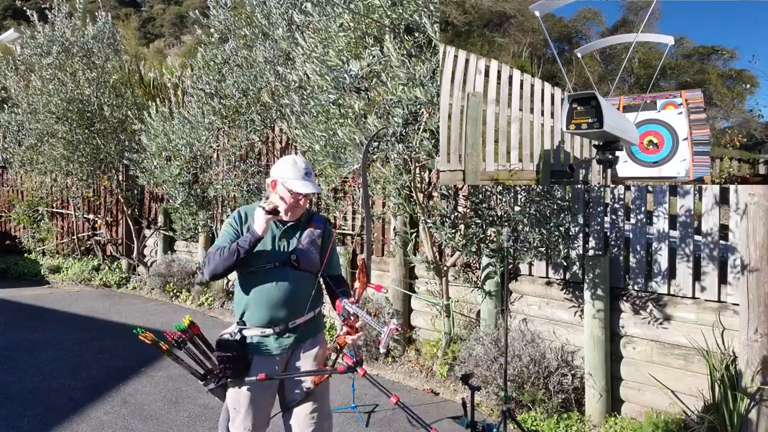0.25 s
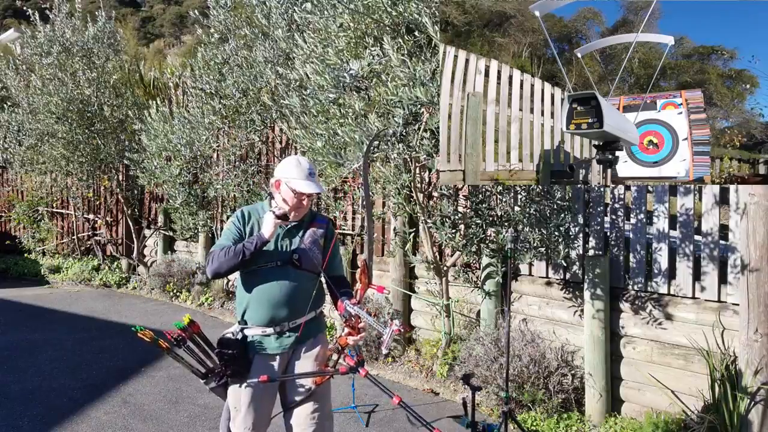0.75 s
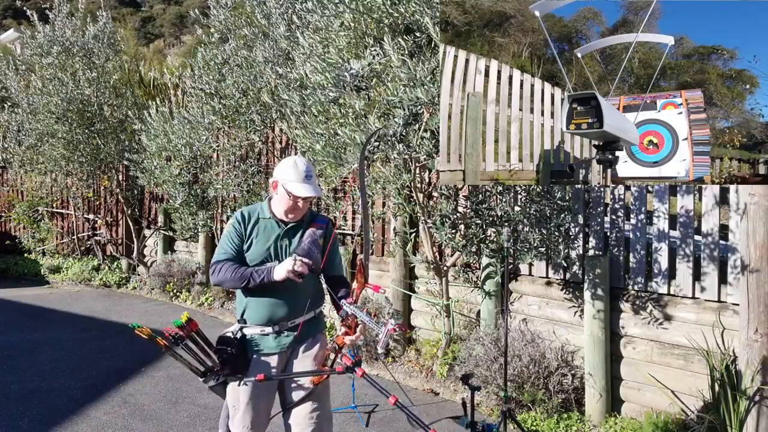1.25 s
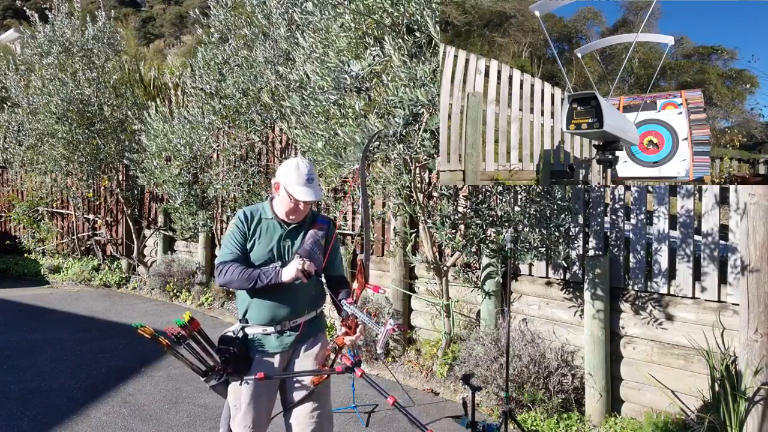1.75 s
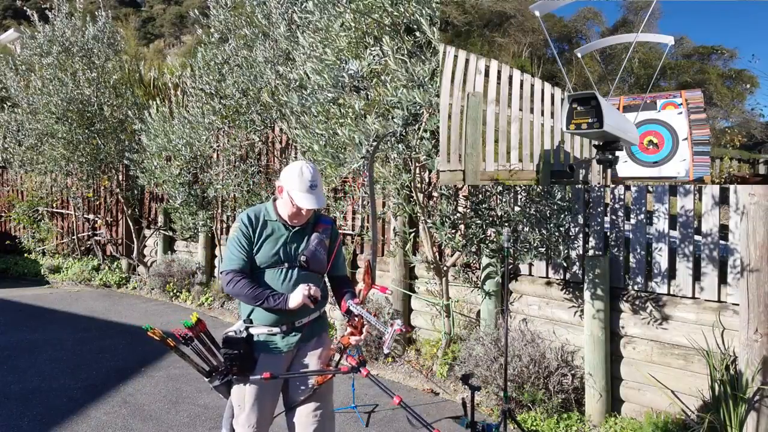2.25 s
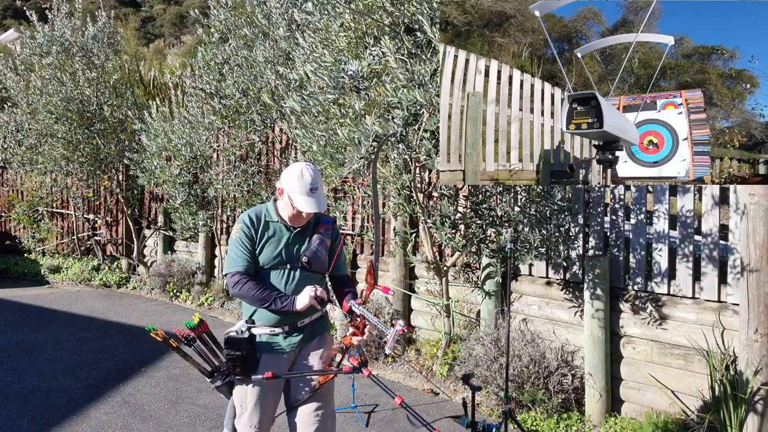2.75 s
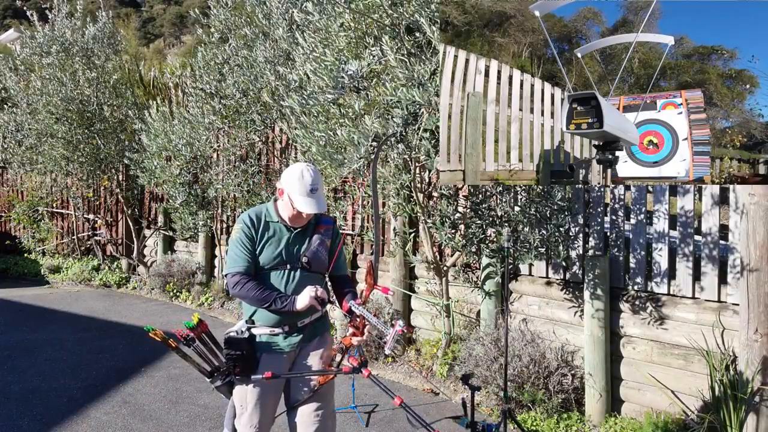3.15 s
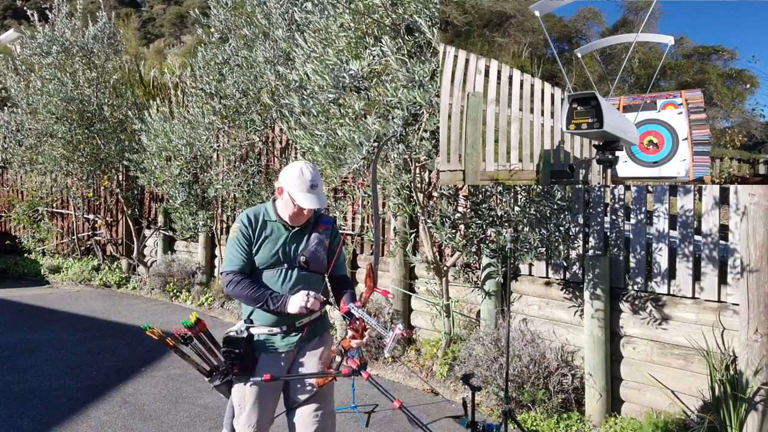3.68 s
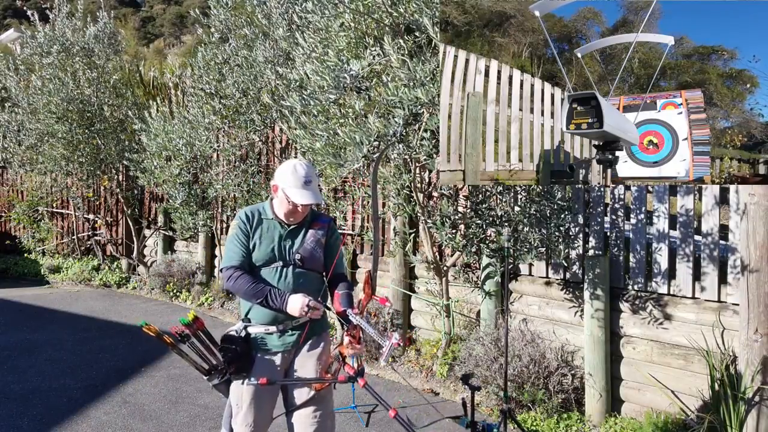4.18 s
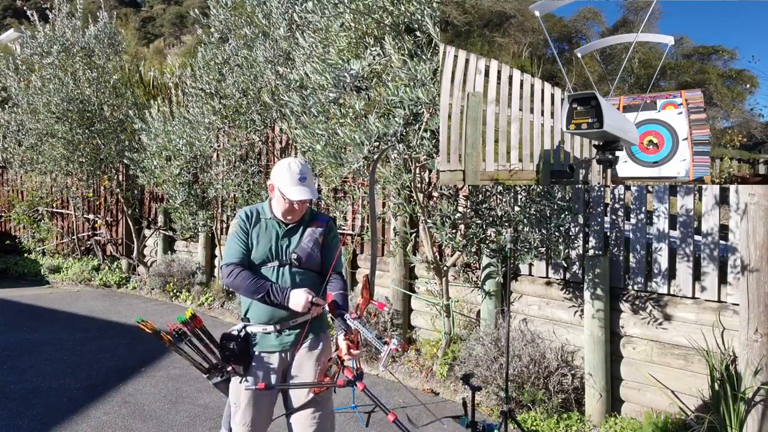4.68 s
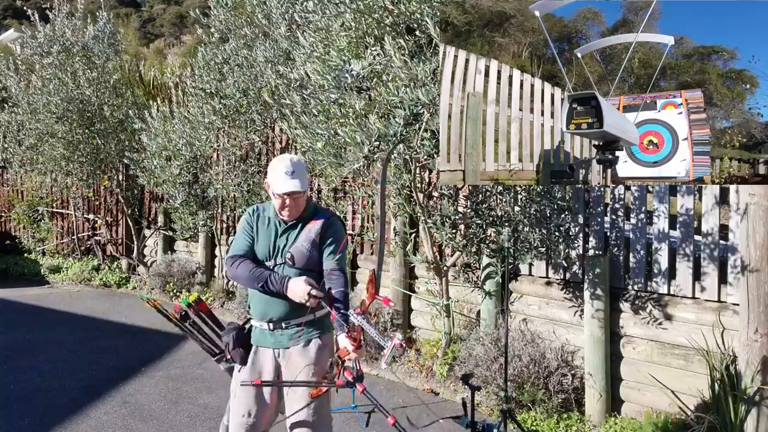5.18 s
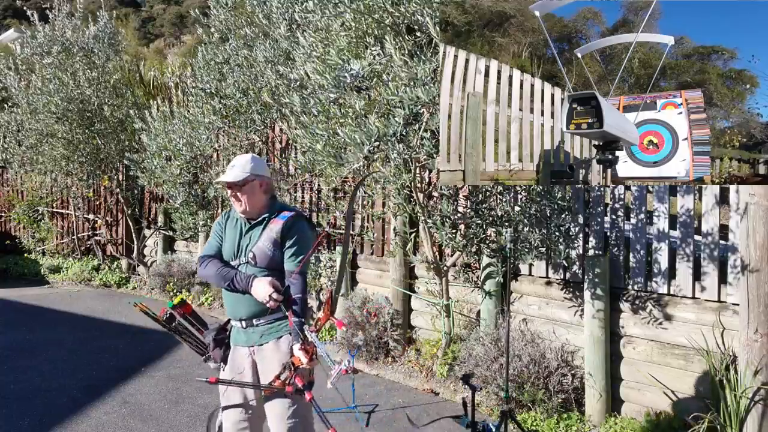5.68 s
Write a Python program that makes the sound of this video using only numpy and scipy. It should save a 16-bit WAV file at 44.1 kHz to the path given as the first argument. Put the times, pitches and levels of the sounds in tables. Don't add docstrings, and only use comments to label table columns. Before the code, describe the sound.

Close, dry handling sounds in stereo outdoors: gusty low thumps differ between left and right at first, with metallic ticks, leathery scuffs and short stick-slip squeaks until about 1.4 seconds. Then mostly soft cicada buzz, far traffic and very faint bird whistles. A single hard, bright nock click rings the bow midway; a duller, shuddering wooden knock and several light taps end it.

```python
import sys
import numpy as np
from scipy import signal
from scipy.fft import rfft, irfft, next_fast_len
from scipy.io import wavfile
from scipy.ndimage import uniform_filter1d, map_coordinates

SR = 44100
rng = np.random.default_rng(int(sys.argv[2]) if len(sys.argv) > 2 else 0)


def elevation(decibels):
    levels = np.asarray(decibels, float)
    return 10 ** (levels / 20)


def generate_wav(sig):
    pcm = np.round(np.clip(np.atleast_2d(sig).T, -1, 1) * 32767).astype(np.int16)
    wavfile.write(sys.argv[1], SR, pcm)


N = 261072

# (time [s], strength [dB], lean to left port [dB])
WIND_STRENGTH = [(0.0, -47.5, -1), (0.08, -37, 6), (0.25, -52, 8.0), (0.43, -39, 14), (0.56, -48.5, 1),
                 (0.67, -33, -1), (0.77, -43, -4.0), (0.81, -37, -6), (1.17, -57, 4), (2.09, -74, -8),
                 (2.41, -56, 14), (2.57, -54, -10), (2.74, -74, 8), (2.97, -54, -9), (3.26, -66, 6.5),
                 (5.13, -64.5, -4), (5.23, -54, 7), (5.92, -70, 4)]
# (frequency [Hz], level [dB])
EDDY_SPECTRUM = [(12, -43), (25, 2.5), (45, -6), (75, -2.5), (105, -6.5), (125, -10.5), (140, -26),
                 (250, -29.5), (500, -120)]
# (time [s], peak level [dB], width [s], swing [Hz])
LEFT_PUFFS = [(.025, -32, .015, 55), (.0745, -23.5, 0.038, 48), (.122, -30.5, 0.023, 70),
              (0.282, -36, 0.056, 55), (.37, -36, .015, 50), (.426, -29, .012, 55), (.449, -26, 0.021, 48),
              (.498, -30.5, .02, 65.4), (0.6568, -18.5, .016, 55), (.6776, -25, .015, 45),
              (.7, -20.5, 0.015, 65), (.7844, -27.5, 0.037, 52), (0.8452, -20.5, 0.014, 58),
              (0.9087, -22.5, 0.014, 58), (0.9322, -25.5, .02, 45), (1.1818, -35.5, .02, 58),
              (1.2972, -37.5, .02, 58), (2.271, -36.5, .015, 65), (2.3777, -38.5, 0.011, 65),
              (3.013, -39, .015, 58), (3.68, -38.5, .02, 58), (5.2395, -38.5, .012, 62)]
RIGHT_PUFFS = [(.044, -26, 0.011, 60), (.06, -21.5, .018, 68), (.098, -34, .03, 70), (.449, -33, .02, 55),
               (.57, -34, 0.014, 55), (0.6467, -18, .011, 62), (.6616, -15, 0.013, 68),
               (.683, -21, 0.013, 60), (.7304, -26, 0.028, 52), (.8, -18.5, 0.011, 55.4),
               (0.822, -19, .022, 42.2), (.852, -11, .013, 71), (.8837, -26, 0.016, 50),
               (0.9226, -20.5, .022, 45), (.944, -23.5, .016, 69.6), (1.0214, -35, 0.036, 72),
               (1.08, -37.5, .015, 65), (2.535, -37.5, .04, 45), (5.612, -42, .01, 60)]
# (frequency [Hz], unsteadiness [Hz], level [dB])
MOTOR_ORDERS = [(55.2, 6, -67), (66.5, 2.993, -58), (100.3, 2.49, -56), (120.4, 2.994, -68.5),
                (82.8, 33, -65.5)]
# (time [s], far traffic and leaves [dB], cicadas [dB])
BACKGROUND = [(0.0, -62.5, -66), (3.89, -65, -67), (5.92, -62.5, -66.5)]
# (frequency [Hz], level [dB])
FAR_SPECTRUM = [(100, -120), (125, -3.5), (228, -8.5), (308, -4), (433, -1.5), (562, -5), (730, -6.5),
                (1730, -13), (2110, -16), (3630, -17.5), (4100, -23.5), (5530, -27.5), (10100, -33.5),
                (15700, -34)]
# (frequency [Hz], likeness [-1..1])
LIKENESS = [(130, 0.7), (290, 0.63), (640, -0.01), (1400, -0.05), (4000, -0.08)]
# (frequency [Hz], level [dB])
TYMBAL = [(5200, -120), (5700, -38.5), (6400, -5), (7180, 3.5), (7900, -3.5), (8600, -15), (9400, -19),
          (10200, -71), (11000, -120)]

# (time [s], level [dB], resonance [Hz])
PINGS = [(.425, -42.5, 7770), (.960, -41, 7000), (.967, -51, 10100), (1.2265, -43, 4400), (1.18, -44, 4700),
         (1.236, -48, 3800), (1.265, -44, 1670), (1.45, -59, 4570), (.648, -52, 4600)]
CLACKS = [(.6225, -43, 5300), (.6225, -42.5, 6500), (.627, -44, 5100), (.617, -52, 2300),
          (.6225, -45, 3700), (1.286, -55, 11000), (1.1665, -53, 10300), (.81, -57, 2200),
          (.915, -56, 3830), (.969, -47, 4200), (5.785, -54, 1950), (.963, -54, 13500), (1.263, -52, 3500),
          (3.925, -59, 9200), (3.925, -63, 13000), (1.265, -47, 2250), (3.925, -55.5, 5300)]
SCUFFS = [(.968, -40.5, 3700), (1.108, -52, 1400), (1.06, -50.5, 1400), (1.287, -56, 9500),
          (1.285, -50, 1300), (1.369, -52, 3000), (2.25, -57.5, 4200), (3.928, -52.5, 3000),
          (5.775, -49, 1500), (5.792, -45, 1380), (.425, -47, 500), (0.22, -52, 300), (0.04, -55, 600)]
TAPS = [(.366, -38, 320), (4.74, -48, 1700), (5.251, -45, 1200), (5.4795, -40, 1100), (5.523, -44, 1700),
        (5.56, -40, 1400), (5.62, -44, 1500), (.915, -46.5, 13000), (.928, -54, 11500), (.426, -52, 11000),
        (5.6725, -33, 1500), (5.688, -42, 1400), (.848, -42, 230)]
# (width over pitch [ratio], t60 [s], crack [dB], attack [s])
PING_KIND = (0.091, 0.042, -12, .001)
CLACK_KIND = (0.17, 0.045, -4, .001)
SCUFF_KIND = (.55, 0.057, -9, .003)
TAP_KIND = (1.05, .012, -36, .0006)
# (frequency [Hz], level [dB])
CRACK_SPECTRUM = [(300, -14), (1500, 0), (4000, 1), (6500, -5), (10000, -10.5), (13000, -17), (16000, -22)]

# (frequency [Hz], level [dB], t60 [s])
BUCKLE_MODES = [(1490, -13, 0.04), (2019, -4, 0.037), (2186, 0.5, .04), (2320, 0.5, 0.041),
                (2977, -13, .05), (3714, -10, .03), (4980, -11.5, .05), (6045, -13, .04), (6500, -16, .02),
                (8400, -18, .03)]
# (time [s], level [dB], brightness [dB/octave])
BUCKLE_HITS = [
    (0.6226, -39, 2),
    (.627, -41, -4.5),
    (0.6407, -46, -5),
]
# (time [s], level [dB], frequency [Hz], t60 [s])
CHIMES = [(1.1665, -34.5, 4320, 0.036), (1.0555, -45, 4170, 0.045), (1.147, -43, 5000, .025),
          (1.2265, -41, 4260, .03), (1.2625, -42, 4200, 0.015), (1.2275, -46, 5050, .04),
          (1.2315, -37, 4730, .035), (1.237, -48, 3500, .05), (1.264, -43, 1680, .04),
          (.9595, -46, 7050, .05), (.964, -46, 6900, .04), (.425, -48, 7800, .03), (.885, -52, 3980, 0.028),
          (5.7745, -45, 5150, 0.017), (3.3192, -20.5, 4300, 0.0096), (3.3222, -33, 7800, .012),
          (3.3193, -23, 4800, .009), (3.3219, -16.5, 1800, .011), (3.3183, -32, 9900, .006),
          (3.319, -24, 1250, .012), (.6265, -39, 1497, .04), (.6745, -50, 4500, .012),
          (5.7745, -53, 4200, .015), (5.774, -58, 2800, .015), (5.787, -55, 4000, .012),
          (5.761, -59, 5200, .015), (.972, -53, 3020, 0.073), (.807, -55, 5650, .025),
          (.817, -56, 5650, .025)]

# (full pressure at [s], held [s], level [dB], hiss [dB], low [dB])
RUBS = [(.812, .004, -65, -9, -1), (.972, .004, -61.5, -7, -16), (.64, 0.032, -64, -13, -6),
        (1.05, 0.071, -62, -7, -11), (1.17, 0.077, -61, -5.5, -12), (1.285, 0.0092, -67, -18, 1.5),
        (1.34, 0.041, -76, -6, -2), (4.98, 0.17, -70.5, -21, 1), (5.77, .03, -68.5, -30, 2.5)]
# (frequency [Hz], width [Hz], level [dB])
SHAFT_MODES = [(2200, 81, -19), (2870, 68, 5.5), (3770, 35, 1), (4120, 55, 1), (4780, 120, -2.5),
               (5810, 100, 3), (7600, 130, -9), (10400, 140, -18)]
# (time [s], pitch [Hz], level [dB])
SLIDE_IN = [(.912, 5300, -60), (.922, 6000, -57), (.94, 7000, -50)]
SLIDE_OUT = [(1.026, 6200, -48), (1.04, 4430, -49), (1.05, 4250, -53), (1.058, 4167, -48),
             (1.08, 4180, -53)]
# (start [s], length [s], first pitch [Hz], last pitch [Hz], peak level [dB])
SQUEALS = [(.815, 0.037, 3030, 3000, -58), (.868, .017, 3830, 3880, -57), (.881, 0.012, 3900, 4050, -48.5),
           (.892, .012, 4300, 4900, -51), (.903, .013, 4800, 5050, -58), (.662, .017, 4250, 4300, -61),
           (1.035, .015, 5500, 5400, -58), (1.055, .03, 5200, 5150, -58), (1.078, .02, 4900, 4800, -51),
           (1.1, .035, 4900, 5200, -54), (1.1, 0.031, 3050, 2850, -56), (1.122, .026, 2150, 2160, -56.5),
           (1.137, .018, 4350, 4350, -52), (1.135, .03, 5920, 5890, -56), (1.168, 0.031, 5900, 5850, -59),
           (1.16, 0.032, 2250, 2160, -55), (1.19, .013, 2100, 2300, -46.5), (1.2, .022, 2390, 2300, -53),
           (1.165, 0.029, 1900, 1700, -55.5), (1.166, 0.032, 3780, 3730, -48.5),
           (1.177, .016, 4400, 4500, -51), (1.19, .015, 4500, 4400, -56), (1.21, .026, 6300, 6300, -62),
           (1.24, 0.022, 4500, 4700, -57), (0.81, .02, 3850, 3830, -63)]
# (start [s], length [s], first pitch [Hz], last pitch [Hz], peak level [dB])
GROANS = [(4.98, 0.05, 670, 675, -55), (4.99, 0.042, 830, 860, -60), (4.99, 0.016, 455, 450, -58),
          (5.092, .018, 850, 850, -50), (5.11, .04, 710, 760, -61), (5.03, 0.02, 770, 770, -56),
          (5.085, 0.067, 1320, 1428, -53), (5.025, 0.035, 1480, 1486, -57.5),
          (5.068, .015, 2100, 2250, -57), (5.095, .03, 2100, 2100, -58), (5.065, .02, 710, 710, -55)]
# (start [s], length [s], first pitch [Hz], last pitch [Hz], peak level [dB])
WHISTLES = [(.77, .16, 2070, 2150, -67), (1.48, .08, 3750, 3500, -68), (1.58, .1, 3750, 3750, -74),
            (2.55, .08, 3750, 3700, -76), (2.72, .06, 3750, 3700, -76), (3.22, .05, 3750, 3700, -75),
            (3.36, .1, 3750, 3700, -74), (3.52, .04, 3780, 3700, -69), (3.64, .06, 3750, 3700, -73),
            (4.08, .08, 2520, 2500, -74), (4.19, .07, 2500, 2470, -73), (5.84, .13, 2500, 2450, -67)]
# (from [s], to [s], low pitch [Hz], high pitch [Hz], level [dB])
CHATTER = (1.04, 1.27, 3200, 6200, -55)

# (time [s], level [dB], crack [dB], brightness [dB/octave])
SNAPS = [
    (3.3184, -35, 8, 5),
    (3.3195, -29, 3, 1),
    (3.3221, -23, -5, -1),
    (3.3245, -38, 9, 4),
    (3.332, -31, -17, -5),
]
# (frequency [Hz], level [dB], t60 [s])
NOCK_MODES = [(1140, -6, 0.03), (1380, -12, 0.025), (1800, -4, 0.024), (2100, -5.5, 0.023),
              (2850, -10, 0.026), (4270, -8, .016), (4760, -8, 0.009), (6050, -20, 0.011),
              (7800, -12, 0.012), (9800, -15.5, 0.0082)]
# (frequency [Hz], level [dB])
RATTLE_SPECTRUM = [(300, -29), (600, -15), (1200, -4), (1900, 0), (2600, -3), (4500, -17), (6000, -26),
                   (10000, -22), (16000, -38)]
# (frequency [Hz], level [dB], t60 [s])
BOW_MODES = [(451, -20.5, .36), (472, -18, .1), (654, -16, .32), (560, -18, .07), (857, -23, .25),
             (1107, -20, .24), (1367, -17, .15), (1508, -14, .08), (1618, -3, .1), (1745, -5, .08),
             (1840, -14, .09), (2070, -8, .07), (2115, -6, .08), (2390, -18, .08)]
# (frequency [Hz], level [dB], t60 [s])
RISER_MODES = [(2710, -16, 0.055), (2960, -12, .05), (3149, -21, .045), (4199, -16, .04), (4296, -12, .03),
               (4538, -22, .08), (4840, -23, .07), (6831, -24, .04)]
# (time [s], level [dB], brightness [dB/octave], time until pad grips [s])
KNOCKS = [
    (5.0845, -28.5, -1, 0.0055),
    (5.0935, -41, 3, 0.0086),
    (5.103, -41, 1, 0.0047),
    (5.1105, -40, -1, .009),
    (5.127, -42.5, -1, .009),
    (5.1415, -45, -1, 0.0038),
]
# (frequency [Hz], level [dB], t60 [s])
STAND_MODES = [(548, -9.5, 0.029), (811, 1, 0.035), (1335, -5, 0.029), (1670, -12, 0.022),
               (2245, -12, 0.025), (3300, -15, .012)]


def unit(x):
    return x / np.sqrt(np.mean(x ** 2, axis=-1, keepdims=True) + 1e-20)


def along(points, hz):
    f, v = np.transpose(points)
    return np.interp(np.log(hz + 1), np.log(f + 1), v)


def curves(rows):
    s, *cols = np.transpose(rows)
    return [np.interp(np.arange(N) / SR, s, c) for c in cols]


def wobble(rate_hz):
    knots = rng.standard_normal(int(N * rate_hz / SR) + 4)
    return map_coordinates(knots, [np.arange(N) * rate_hz / SR])


def filtered(x, response):
    m = next_fast_len(N + 8192)
    return irfft(rfft(x, m) * response(np.fft.rfftfreq(m, 1 / SR)), m)[..., :N]


def coloured(x, spectrum):
    return unit(filtered(x, lambda hz: elevation(along(spectrum, hz))))


def add(track, s, sound):
    part = track[..., max(round(s * SR), 0):][..., :sound.shape[-1]]
    part += sound[..., :part.shape[-1]]


def ring(modes, tilt_db, scatter_db, attack_s):
    t = np.arange(SR // 4) / SR
    hz, db, t60_s = np.transpose(modes)[:, :, None]
    strength, phase = rng.standard_normal((2, len(hz), 1))
    level_db = db + tilt_db * np.log2(hz / 1000) + scatter_db * strength - 60 * t / t60_s
    partials = elevation(level_db) * np.sin(2 * np.pi * hz * t + 0.42 * phase)
    return partials.sum(axis=0) * (1 - np.exp(-t / attack_s))


def burst(gain, t60_s, attack_s):
    t = np.arange(SR // 4) / SR
    spectrum = rfft(rng.standard_normal(len(t))) * gain(np.fft.rfftfreq(len(t), 1 / SR))
    noise = irfft(spectrum, len(t))
    shape = elevation(-60 * t / t60_s) * (1 - np.exp(-t / attack_s))
    return unit(noise * shape) * np.sqrt(np.mean(shape ** 2))


def crack(t60_s):
    return burst(lambda hz: elevation(along(CRACK_SPECTRUM, hz)), t60_s, 0.00024)


def glides(rows):
    return [[(s, first_hz, db), (s + length_s, last_hz, db)] for s, length_s, first_hz, last_hz, db in rows]


def tones(calls, rough_rad, breaks_db):
    swell_db, thins_db_per_octave = 7, 30
    out = np.zeros(N)
    shake, slip = wobble(400), -wobble(110) ** 2
    for k, points in enumerate(calls):
        s, hz, db = np.transpose(points)
        t = np.arange(s[0], s[-1], 1 / SR)
        u = np.linspace(-1, 1, len(t))
        part = slice(k * SR // 5, k * SR // 5 + len(t))
        pitch_hz = np.interp(t, s, hz)
        phase = 2 * np.pi * np.cumsum(pitch_hz) / SR + rough_rad * shake[part]
        thinning_db = thins_db_per_octave * np.log2(pitch_hz / hz.min())
        swell = elevation(np.interp(t, s, db) - swell_db * u ** 2 - thinning_db) * (1 - u ** 8)
        add(out, s[0], swell * elevation(breaks_db / 2 + breaks_db * slip[part]) * np.sin(phase))
    return out


def wind():
    murmur_top_db = -45
    strength_db, lean_db = curves(WIND_STRENGTH)
    lumps = elevation(3.1 * np.array([wobble(14), wobble(14)]))
    port_db = np.minimum([strength_db + lean_db / 2, strength_db - lean_db / 2], murmur_top_db)
    murmur = elevation(port_db + 4.0) * coloured(lumps * rng.standard_normal((2, N)), EDDY_SPECTRUM)

    lead = SR // 10
    t = np.arange(-lead, lead) / SR
    puffs = np.zeros((2, N + lead))
    for port, rows in zip(puffs, (LEFT_PUFFS, RIGHT_PUFFS)):
        for s, db, width_s, swing_hz in rows:
            bell = np.exp(-.5 * (2 * t / width_s) ** 2)
            add(port, s, -elevation(db) * bell * np.cos(2 * np.pi * swing_hz * t))

    def wind_guard(hz):
        return .012 + 1 / (1 + (hz / 125) ** 16)
    return murmur + filtered(puffs[:, lead:], wind_guard)


def motor():
    t = np.arange(N) / SR
    out = np.zeros(N)
    for hz, spread_hz, db in MOTOR_ORDERS:
        strength = elevation(db + 2.0 + 1.73 * wobble(spread_hz))
        out += strength * np.sin(2 * np.pi * hz * t + 1.21 * wobble(spread_hz))
    return out


def traffic_and_leaves():
    z = signal.stft(rng.standard_normal((2, N)), nperseg=512)[2]
    patches = rng.standard_normal(z.shape[1:])
    patches = uniform_filter1d(uniform_filter1d(patches, 6, 0), 14, 1)
    pair = signal.istft(z * elevation(0.71 * patches / patches.std()), nperseg=512)[1][:, :N]

    def mid_side(hz):
        angle = np.arccos(np.clip(along(LIKENESS, hz), -1, 1)) / 2
        return elevation(along(FAR_SPECTRUM, hz)) * [np.cos(angle), np.sin(angle)]
    mid, side = filtered(pair, mid_side)
    return unit(np.array([mid + side, mid - side]))


def cicadas():
    beats = np.zeros((2, N))
    for rate_hz in rng.uniform(260, 370, size=4):
        for side_beats in beats:
            cycle = np.cumsum(rate_hz * (1 + 0.077 * wobble(4.1))) / SR
            side_beats += elevation(1.8 * wobble(3.8)) * np.exp(-4 * (cycle % 1))
    return coloured(np.sqrt(beats + .8) * rng.standard_normal((2, N)), TYMBAL)


def garden():
    far_db, cicada_db = curves(BACKGROUND)
    return elevation(far_db + 2.5) * traffic_and_leaves() + elevation(cicada_db + [[4], [1.5]]) * cicadas()


def ticks():
    out = np.zeros(N)
    kinds = [(PINGS, PING_KIND), (CLACKS, CLACK_KIND), (SCUFFS, SCUFF_KIND), (TAPS, TAP_KIND)]
    for rows, (width, t60_s, crack_db, attack_s) in kinds:
        for s, db, centre_hz in rows:
            def resonance(hz):
                peak = 1 / (1 + (2 * (hz / centre_hz - 1) / width) ** 2)
                return peak / (1 + (hz / centre_hz / 1.6) ** 8)
            contact = burst(resonance, t60_s, attack_s) + elevation(crack_db) * crack(t60_s)
            add(out, s, elevation(db - 5.5) * contact)
    return out


def buckle():
    out = np.zeros(N)
    for s, db, bright_db in BUCKLE_HITS:
        add(out, s, elevation(db) * ring(BUCKLE_MODES, bright_db, 1.6, 0.00056))
    for s, db, hz, t60_s in CHIMES:
        add(out, s, elevation(db) * ring([(hz, 0, t60_s)], 0, 0, 0.0013))
    return out


def rubbing():
    press_db_per_s, lift_db_per_s = 261, 282
    density = np.array([3.2 * wobble(400) + 1.8 * wobble(30) for _ in range(3)])
    grains = elevation(density) * rng.standard_normal((3, N))

    def shaft(hz):
        total = 0.38 * (hz > 2300) * (hz < 9000)
        for k, (centre_hz, width_hz, db) in enumerate(SHAFT_MODES):
            damping = 1j * hz * 3 * width_hz
            total = total + (-1) ** k * elevation(db) * damping / (centre_hz ** 2 - hz ** 2 + damping)
        return total
    body = unit(filtered(grains[0], shaft))
    hiss = coloured(grains[1], [(6000, -36), (8000, 6.5), (12000, 9.0), (15500, 0)])
    low = coloured(grains[2], [(500, -17), (1000, 1.5), (1700, 0.5), (2500, -5.0), (3500, -34)])

    out = tones([SLIDE_IN, SLIDE_OUT] + glides(SQUEALS), rough_rad=.7, breaks_db=4)
    out = out + tones(glides(GROANS), rough_rad=.6, breaks_db=5)
    t = np.arange(N) / SR
    for s, held_s, db, hiss_db, low_db in RUBS:
        pressing_db = press_db_per_s * np.clip(s - t, 0, 1)
        lifting_db = lift_db_per_s * np.clip(t - s - held_s, 0, 1)
        out = out + elevation(db - pressing_db - lifting_db) * (body + elevation(hiss_db) * hiss + elevation(low_db) * low)
    return out


def birds():
    return tones(glides(WHISTLES), rough_rad=.5, breaks_db=4.5)


def chatter():
    start_s, end_s, low_hz, high_hz, db = CHATTER
    out, t = np.zeros(N), np.arange(SR // 100) / SR
    for when, pitch, bend, size in rng.uniform(size=(50, 4)):
        hz = low_hz + (high_hz - low_hz) * pitch
        phase = 2 * np.pi * hz * (t + 4 * (bend - .4) * t ** 2)
        slip = np.sin(np.pi * t / t[-1]) ** 2 * np.sin(phase)
        add(out, start_s + (end_s - start_s) * when, elevation(db - 12.0 * size) * slip)
    return out


def nock():
    seating_s, seating_db = 0.013, -44
    out = np.zeros(N)
    for s, db, crack_db, bright_db in SNAPS:
        snap = elevation(-4.0) * ring(NOCK_MODES, bright_db, 0.79, 0.00022) + elevation(crack_db - 5.5) * crack(0.015)
        add(out, s, elevation(db) * snap)
    scrape = crack(0.041)[round(seating_s * SR)::-1]
    add(out, SNAPS[0][0] - seating_s, elevation(seating_db) * scrape)
    rattle = burst(lambda hz: elevation(along(RATTLE_SPECTRUM, hz)), 0.12, 0.00062)
    add(out, SNAPS[1][0], elevation(-37.0) * rattle)
    return out


def string():
    out = np.zeros(N)
    add(out, SNAPS[1][0], elevation(-25.0) * ring(BOW_MODES, 0, 0, 0.004))
    add(out, SNAPS[1][0], elevation(-24) * ring(RISER_MODES, 0, 0, 0.001))
    return out


def stand():
    contact_s, grip_db_per_s = 0.0036, 9000
    thud_spectrum = [(300, -12), (800, 7), (1400, -5), (2300, 3), (3300, -28), (4500, -38)]
    out = np.zeros(N)
    for s, db, bright_db, held_s in KNOCKS:
        thud = burst(lambda hz: elevation(along(thud_spectrum, hz)), 0.025, 0.0022)
        t = np.arange(len(thud)) / SR
        loading = np.clip(t / contact_s, 0, 1) * elevation(-grip_db_per_s * np.clip(t - held_s, 0, 1))
        knock = ring(STAND_MODES, bright_db, 0.81, 0.0011) + elevation(-10.5) * thud
        add(out, s, elevation(db + 2.5) * loading * knock)
    return out


def fence(x):
    t60_points = [(300, 0.17), (2000, 0.12), (6000, 0.092), (10000, 0.054)]  # (Hz, s)
    hz, t, z = signal.stft(rng.standard_normal((2, SR // 3)), SR, nperseg=256)
    decay = elevation(-60 * t / along(t60_points, hz)[:, None])
    tail = signal.istft(z * decay, SR, nperseg=256)[1]
    delayed = np.pad(x, (200, 0))[None]
    return signal.fftconvolve(delayed, tail / np.linalg.norm(tail[0]), axes=1)[:, :N]


def scene():
    def port_lag(hz):
        return np.exp(-1j * np.outer([1, 0], 1.25 * np.tanh(hz / 2400)))
    outdoors = wind() + motor() + garden()
    handling = ticks() + buckle() + rubbing() + chatter()
    whistles = birds()
    near = (nock() + stand()) * elevation([[.4], [-.4]]) + handling * elevation([[1.5], [-1.5]])
    echo = elevation(-8.5) * fence(near.mean(axis=0) + whistles)
    return filtered(near + string(), port_lag) + whistles + echo + outdoors


def roll_off(x):
    return signal.sosfilt(signal.butter(12, 16500, fs=SR, output="sos"), x)


def record(dry):
    top_hz = 15750
    mix = filtered(dry, lambda hz: hz < top_hz)
    return roll_off(mix)


dry = scene()
out = record(dry)
generate_wav(out)
```